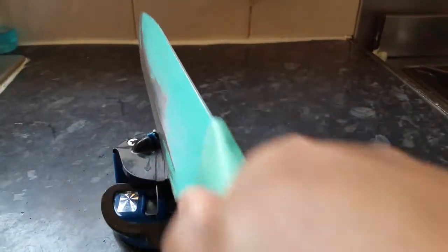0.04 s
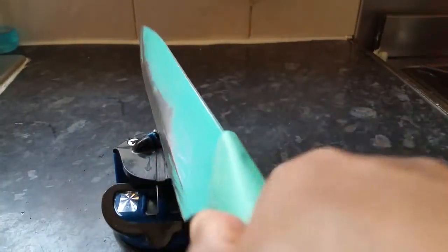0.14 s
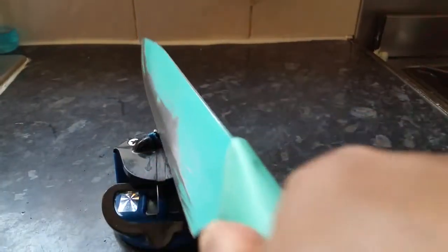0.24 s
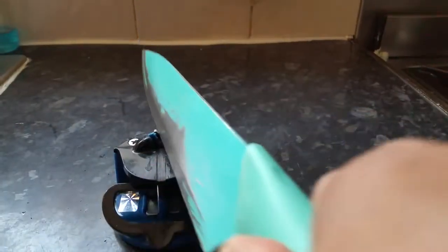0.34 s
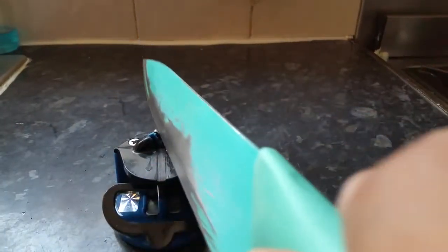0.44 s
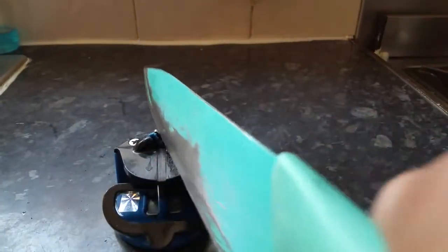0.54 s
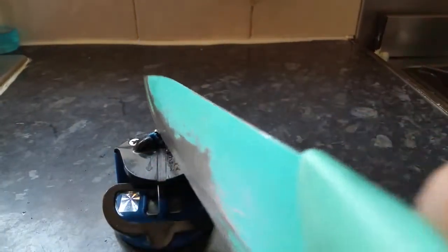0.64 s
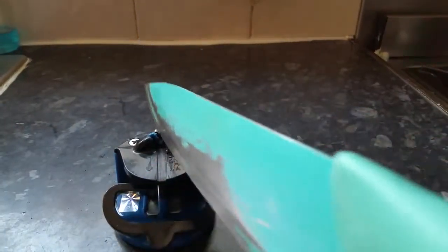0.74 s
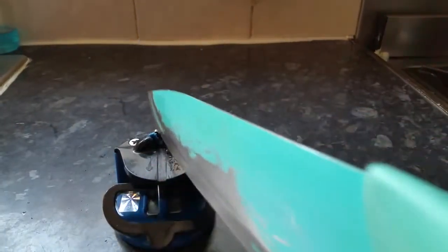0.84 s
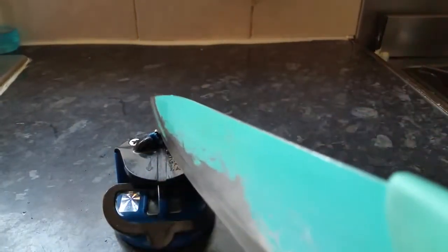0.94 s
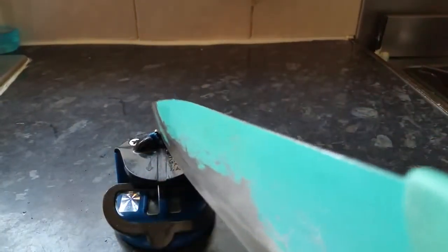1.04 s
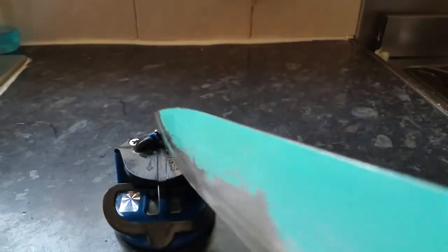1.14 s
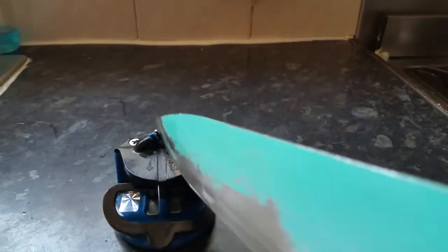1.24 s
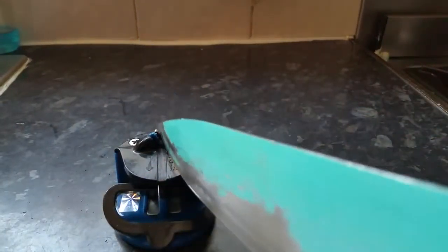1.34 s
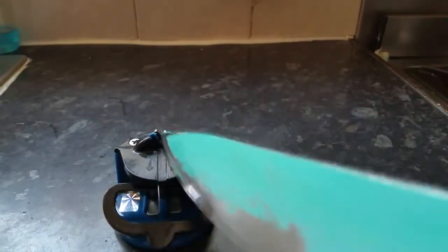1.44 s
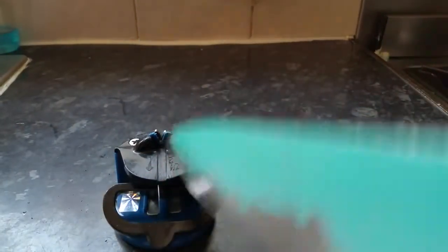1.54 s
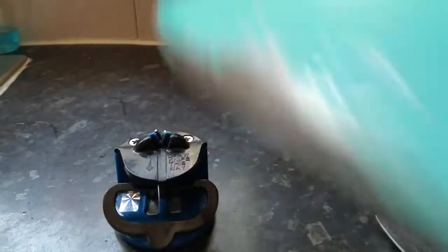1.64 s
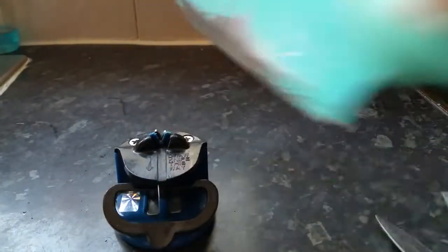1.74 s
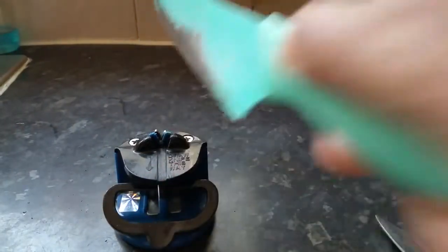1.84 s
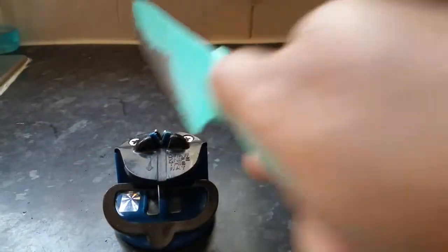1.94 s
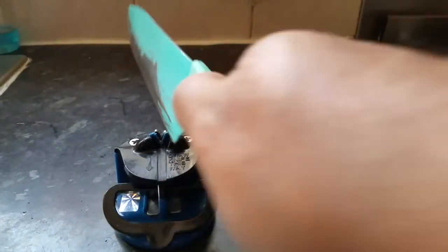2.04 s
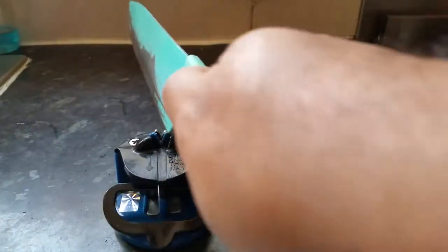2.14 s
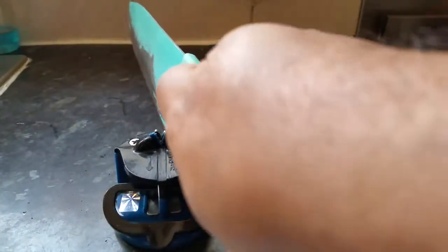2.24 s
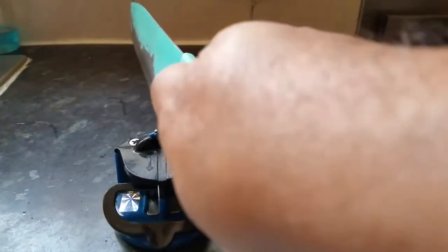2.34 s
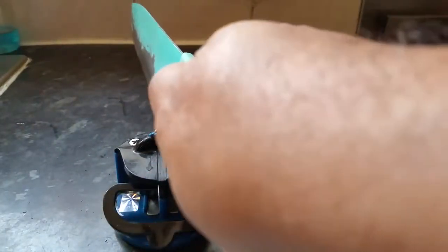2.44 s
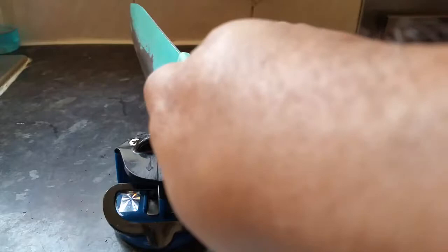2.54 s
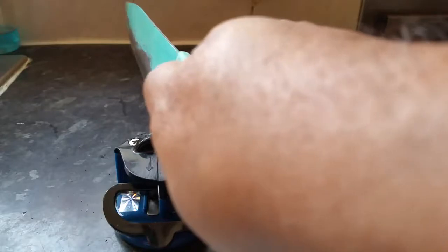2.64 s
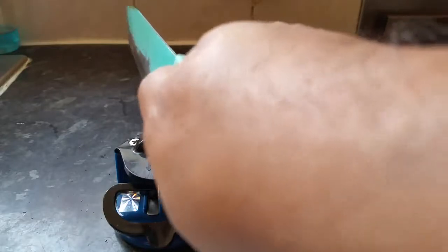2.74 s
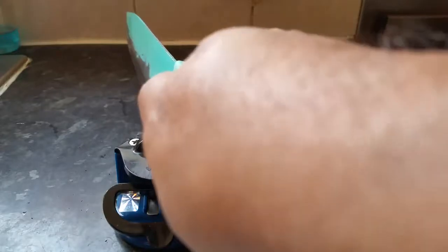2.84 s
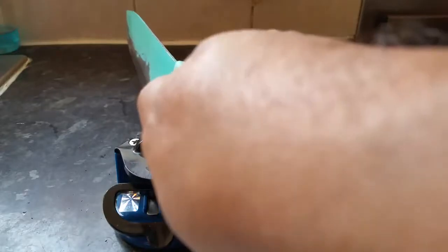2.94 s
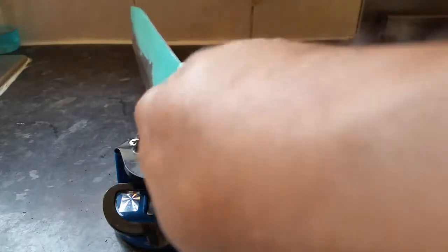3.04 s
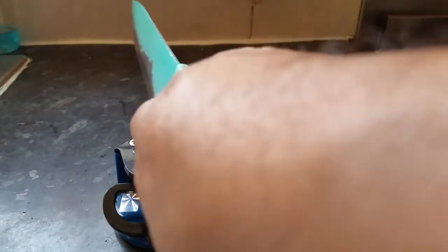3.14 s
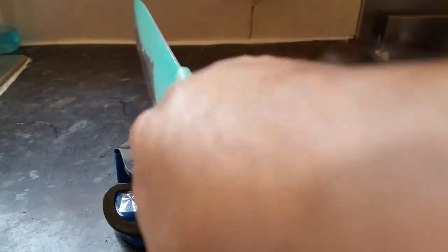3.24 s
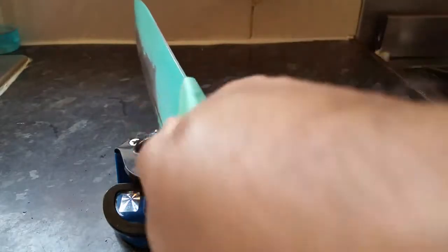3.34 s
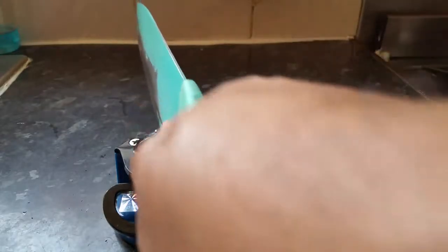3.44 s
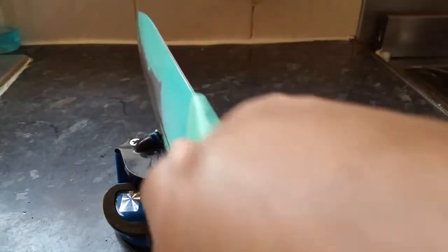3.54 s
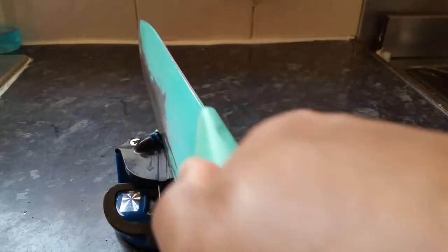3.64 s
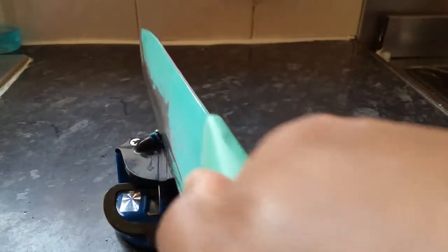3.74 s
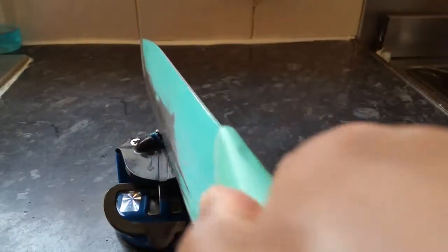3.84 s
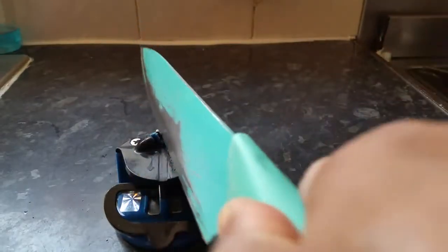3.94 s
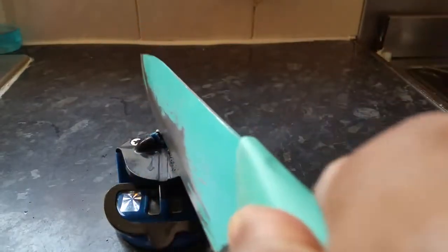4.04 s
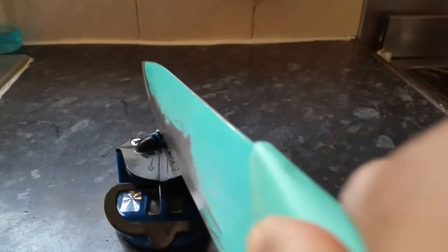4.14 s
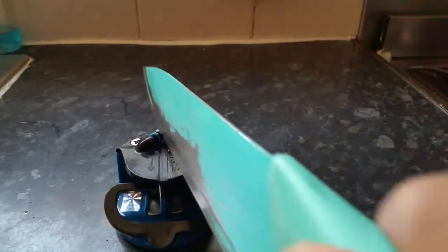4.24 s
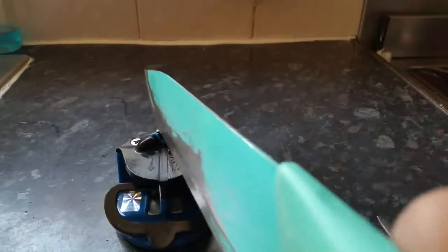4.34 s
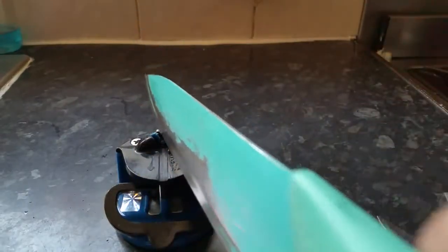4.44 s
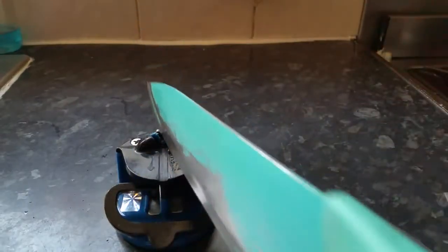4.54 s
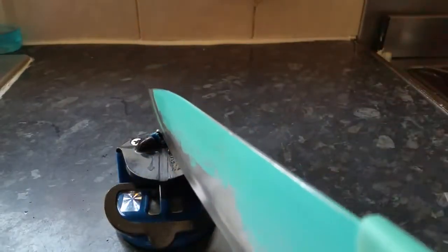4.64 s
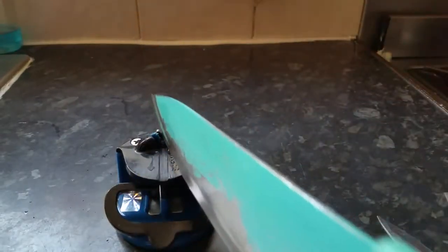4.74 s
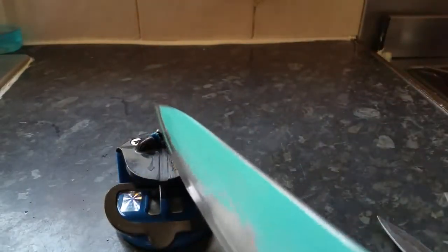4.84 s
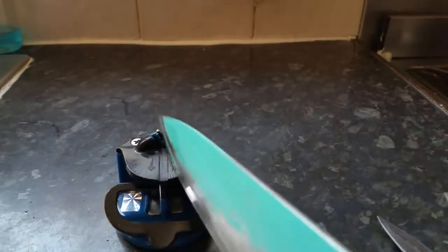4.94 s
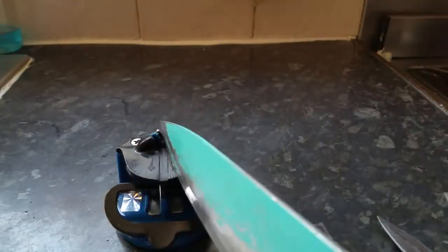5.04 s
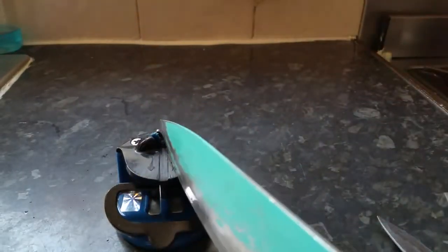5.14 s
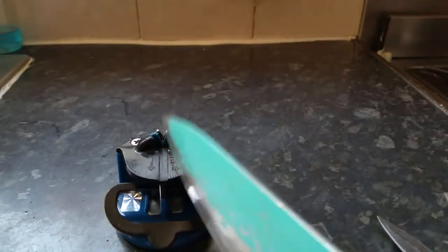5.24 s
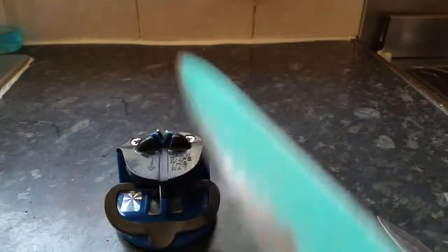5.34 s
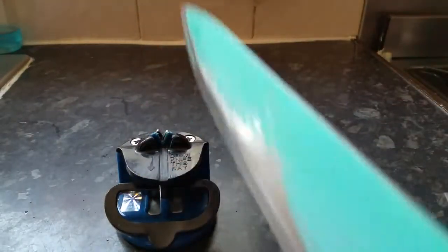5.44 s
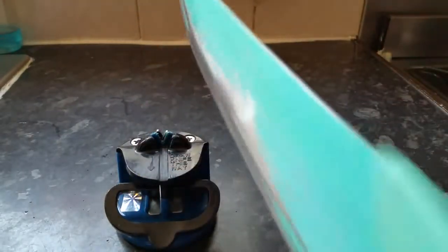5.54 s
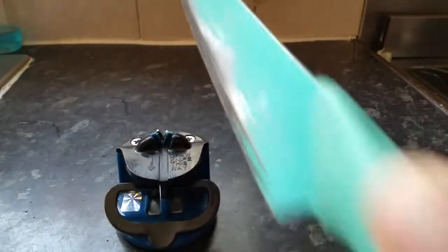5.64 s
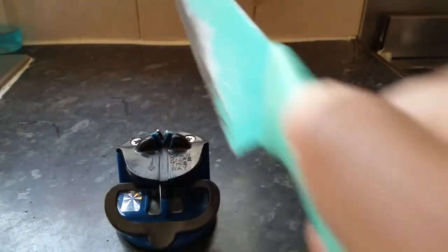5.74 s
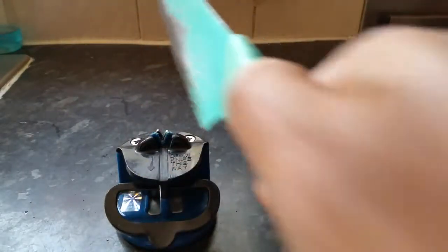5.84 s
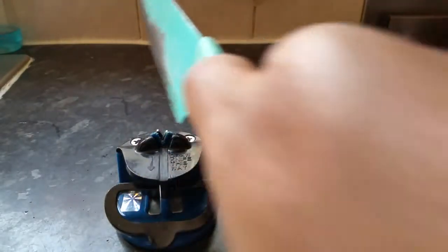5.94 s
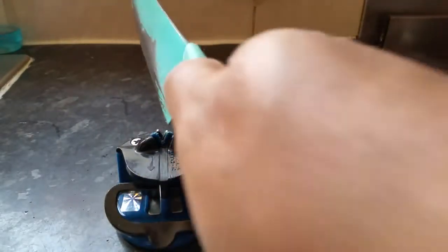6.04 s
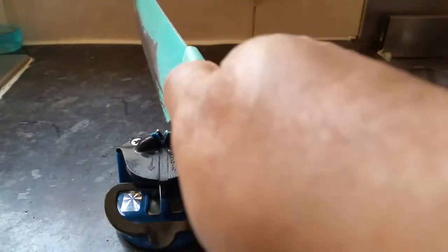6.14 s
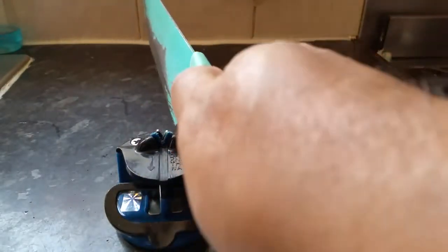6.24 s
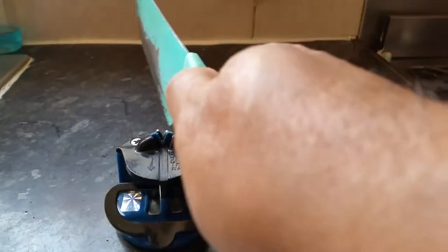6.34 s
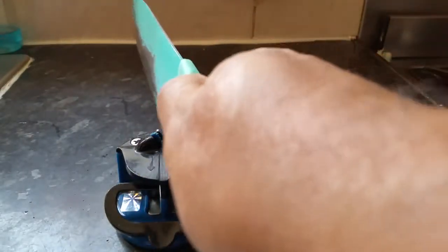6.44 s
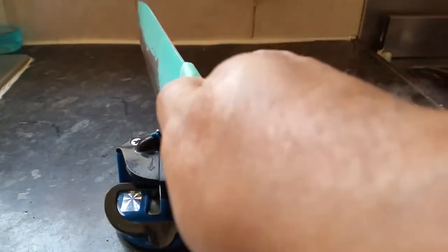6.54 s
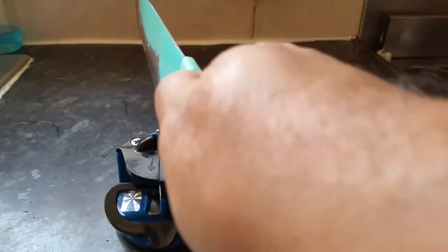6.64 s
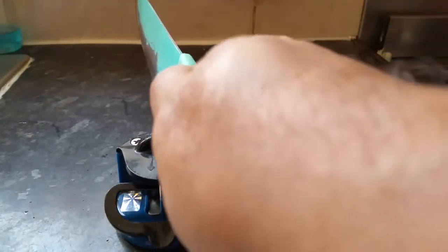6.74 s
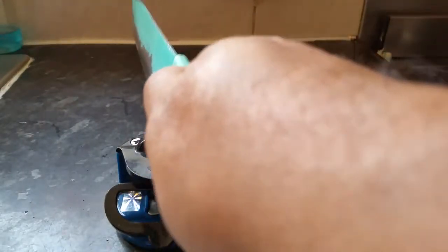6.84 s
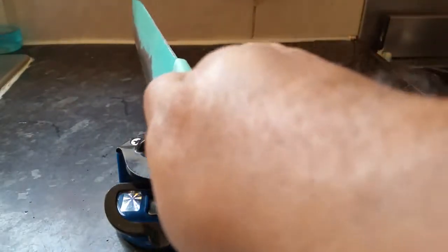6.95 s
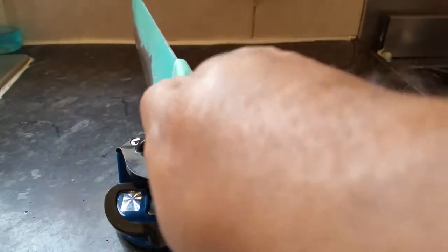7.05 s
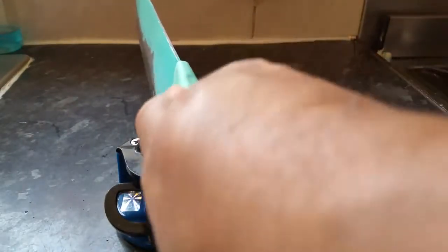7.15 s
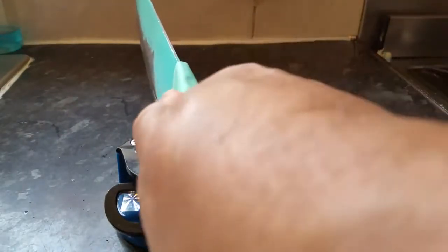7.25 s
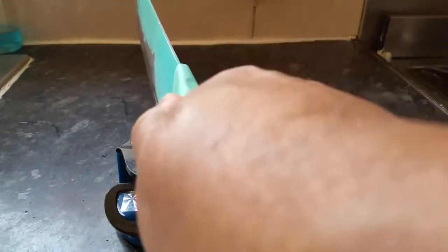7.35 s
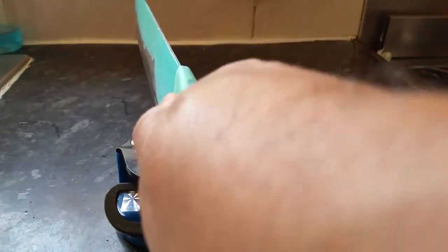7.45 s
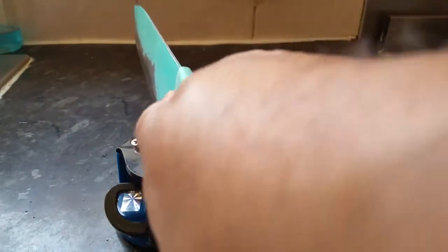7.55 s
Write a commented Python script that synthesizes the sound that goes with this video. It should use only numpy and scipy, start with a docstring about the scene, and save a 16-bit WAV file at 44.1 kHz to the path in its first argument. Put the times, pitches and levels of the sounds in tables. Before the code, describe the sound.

Close stereo sound in a small tiled kitchen, with a short bright reverberation and a quiet low hum. At 0 s a steel blade is already being dragged through a pull-through sharpener: a loud, coarse, gritty rasp with juddering rumble from the worktop and snagging clicks up to 0.6. It gradually weakens and thins after 1.0, then flares briefly and ends with a hard clack at 1.55 as the tip drops. A faint rustle follows until 1.9, soft seating thumps around 2.15, and clicks at 2.9. At 3.3 a dense crackle of snags launches the second rasp, strongest from 3.4 to 4.3, uneven and lighter around 4.45, then drier and scratchier until it stops at 5.06. A tiny hollow tick sounds at 5.33. Sparse clicks and a faint brush come at 6.55 to 7.0. From 7.38 a much quieter, dull third scrape begins with small knocks, still going at the end, about 7.6.

```python
"""A kitchen knife is drawn through a pull-through sharpener that stands on a worktop in a small tiled kitchen.
Stick-slip friction grates the edge over the carbide: dense, clumped slips drive the modes of blade, holder and
worktop, with dry scratch noise. Impulses make the ticks and thuds of the knife in the slot, the clack of its
dropping tip and one hollow touch. Decaying noise echoes form the room; a soft rustle and a quiet hum, both
filtered noise, lie below."""
import sys
import numpy as np
from scipy import signal
from scipy.fft import rfft, irfft, next_fast_len
from scipy.io import wavfile

SR = 44100
rng = np.random.default_rng(int(sys.argv[2]) if len(sys.argv) > 2 else 0)


def transcribe(signal):
    """Save signal, clipped to [-1, 1], as a 16-bit WAV file at the path in sys.argv[1]."""
    frames = np.atleast_2d(signal).T
    limited = np.clip(frames, -1, 1)
    pcm = np.round(limited * 32767).astype(np.int16)
    wavfile.write(sys.argv[1], SR, pcm)


N = 334719   # samples

# pulls of the edge through the slot, one list each: [t/s, grating level/dB, worktop weight over grating/dB]
STROKES = [
    [(0.0, -27.5, 22.5), (0.026, -46, 17.5), (0.045, -29.5, 9.5), (0.11, -29.5, 16), (0.188, -29.5, 2.5),
     (0.234, -34, 10), (0.33, -30.5, 5.5), (0.432, -31, 1.5), (0.55, -31.5, 5.5), (0.668, -32, 1),
     (0.686, -35.5, 5.5), (0.82, -33.5, 4), (0.956, -33.5, 2), (1.03, -40, 2), (1.102, -46.5, 9),
     (1.158, -38, 9), (1.234, -38, 2.5), (1.31, -44, 8), (1.39, -55.5, 16), (1.44, -45, 6),
     (1.514, -51.5, 10), (1.53, -36.5, 11.5), (1.552, -36, 14.5)],
    [(3.322, -42.5, 1.5), (3.348, -47, 23), (3.364, -38.5, 12.5), (3.382, -27, 3), (3.39, -33.5, 7),
     (3.42, -28, 1), (3.442, -34.5, 3), (3.46, -45.5, 17.5), (3.522, -45, 16.5)],
    [(3.522, -41.5, 18.5), (3.58, -34, 5.5), (3.628, -29.5, 10.5), (3.766, -30.5, 6), (3.77, -34, 16),
     (3.85, -33.5, 13), (3.94, -31, 8.5), (4.04, -33, 6.5), (4.146, -34.5, 5), (4.15, -32.5, -1),
     (4.236, -37, 8), (4.288, -31.5, 4), (4.345, -36, 5), (4.39, -42, 9), (4.435, -39, 7.5),
     (4.447, -53, 16), (4.456, -39, 7), (4.484, -39, 5.5), (4.56, -36.5, 6), (4.652, -31.5, 7.5),
     (4.70, -38, -0.5), (4.76, -43.5, 3.5), (4.81, -36, -1), (4.85, -33.5, 2.5), (4.9, -36, -3),
     (4.96, -36, -3), (5.035, -40.5, 9.5), (5.042, -55, 11.5), (5.06, -72, 11)],
    [(7.385, -54, 7), (7.397, -57.5, 34.5), (7.415, -49, 12.5), (7.471, -52, 16), (7.497, -43.5, 19),
     (7.54, -46, 18), (7.59, -48.5, 20)],
]
# the edge brushes the slot while being seated: [middle t/s, half length/s, level/dB, brightness/(dB/octave)]
BRUSHES = [(3.301, 0.03, -53, -2.5), (6.723, 0.06, -56.5, 0), (6.855, 0.012, -49.5, 0.5)]
SEAT_S, LIFT_S = 0.0049, 0.0036   # a stroke fades in as the edge seats, stops as it lifts
HOLDER_OVER_DB, HOLDER_WEIGHT_SHARE = 2.5, 0.25   # the holder feels the grating and part of the weight
BRIGHTNESS, BRIGHTER_PER_DB, FULL_DRAG_DB = 1.7, 0.07, -27   # dB/octave; a lighter drag is brighter


def stroke_controls():
    """Load-dependent friction: grating level and weight set the three bodies' gains and the brightness."""
    t = np.arange(N) / SR
    level_db, weight_db = np.full(N, -200.), np.zeros(N)   # silent between strokes
    for rows in STROKES:
        s, level, weight = np.transpose(rows)
        on = (t >= s[0]) & (t <= s[-1])
        # no fade where a stroke is already under way at the start or still under way at the end
        seating = (t[on] - s[0]) / SEAT_S + (s[0] == 0)
        lifting = (s[-1] - t[on]) / LIFT_S + (s[-1] >= t[-1])
        fade = np.clip(np.minimum(seating, lifting), 1e-6, 1)
        level_db[on] = np.interp(t[on], s, level) + 20 * np.log10(fade)
        weight_db[on] = np.interp(t[on], s, weight)
    brightness = BRIGHTNESS + BRIGHTER_PER_DB * np.clip(FULL_DRAG_DB - level_db, -10, 30)
    for s, half, db, tilt in BRUSHES:
        brush_db = db - 10 * ((t - s) / half) ** 2
        brightness[brush_db > level_db] = tilt
        level_db = np.maximum(level_db, brush_db)
    holder_db = level_db + HOLDER_OVER_DB + HOLDER_WEIGHT_SHARE * weight_db
    return from_db(level_db), from_db(holder_db), from_db(level_db + weight_db), brightness, weight_db


def catches():
    """Stick-slip: uneven one-way pulses, each time a wandering phase completes a turn."""
    rate_hz = 95 * from_db(2.5 * drift(30) + 1.5 * drift(2.5))
    turns = np.cumsum(rate_hz) / SR
    released = np.diff(np.floor(turns), prepend=0) > 0
    return released * from_db(rng.normal(0, 1.0, N))


PULL_STARTS_S, PULL_S = [-0.15, 3.35, 7.38], 1.1


def contact_place():
    """Uniform motion: the contact runs evenly along the edge, from -.5 (heel) to +.5 (tip)."""
    t, starts = np.arange(N) / SR, np.array(PULL_STARTS_S)
    pull = np.maximum(np.searchsorted(starts - .1, t) - 1, 0)
    return np.clip((t - starts[pull]) / PULL_S, 0, 1) - .5


WANDER_DB = 1.8   # the contact travels along the edge, so each mode swells and fades


def dragged(modes, drag, brightness, damping):
    """Forced modal vibration: drag on the slot's two faces drives every damped mode; levels are rms shares."""
    out, place = 0, contact_place()
    for k, (hz, level_db, t60, toward_tip_db) in enumerate(modes):
        t60 = t60 * damping
        unit_rms = np.sqrt(12 * np.log(10) / (t60 * SR))   # evens out the energy of long and short rings
        gain = from_db(level_db + brightness * np.log2(hz / 4000)) * unit_rms
        travel = from_db(toward_tip_db * place + WANDER_DB * drift(3.4))
        both, apart = ring(drag * gain * travel, hz, t60)
        share = np.clip(0.14 * np.log2(hz / 200), 0, 1)   # short waves tell the two faces apart
        out = out + (-1) ** k * (both + share * apart * [[1], [-1]])
    return out / np.sqrt(np.sum(from_db(2 * np.array(modes)[:, 1])))


# unringing scratch bands: [low f/Hz, high f/Hz, level over blade/dB]
GRIT = [(856, 2730, -3.5), (2520, 7050, -6.5), (6390, 9900, -20.5), (9900, 15000, -32),
        (13000, 16500, -37.5)]


def scratch(force, brightness):
    """Abrasive friction noise: the grinding itself, broad and dry, partly apart on the two faces."""
    out = 0
    for low_hz, high_hz, level_db in GRIT:
        both, apart = bandpass(force, low_hz, high_hz)
        gain = from_db(level_db + brightness * np.log2(np.sqrt(low_hz * high_hz) / 4000))
        unit_rms = np.sqrt(SR / 2 / (high_hz - low_hz))
        out = out + gain * unit_rms * (both + 0.53 * apart * [[1], [-1]])
    return out


# modes of the steel blade: [f/Hz, level/dB, t60/s before pressing, gain from heel to tip/dB]
BLADE = [(1508, 2, 0.023, -1), (1900, -6.5, 0.0023, 0.98), (2110, -5.5, 0.022, 1), (2341, -2, 0.018, -1.3),
         (2710, 0.5, 0.026, -1), (2860, 2.5, 0.0052, 0.91), (3590, 0.5, 0.015, 0.97),
         (4390, -5.5, 0.003, 0.91), (4880, -1, 0.007, 1), (5325, -3, 0.007, 0.94),
         (6160, -1.5, 0.009, 0.73), (6517, -3.5, 0.0064, 1), (8250, -10.5, 0.005, 0.99),
         (8700, -12, 0.0064, 0.9)]
# modes of the plastic holder: [f/Hz, level/dB, t60/s before pressing, gain from heel to tip/dB]
HOLDER = [(440, -6.5, 0.045, -5), (458.4, -4, 0.1104, 1.5), (482.3, -4.5, 0.12, 5), (520.5, -6.5, 0.147, 4),
          (547, -3, 0.03, 1), (612.7, 1.5, 0.055, -6), (652, -3, 0.028, -7.5), (810, -6, 0.038, -2),
          (851, -8.5, 0.12, -4), (935.4, -4.5, 0.028, 1.5), (1060, -5.5, 0.033, 3),
          (1181, -10.5, 0.057, -2.5), (1332, -15, 0.041, 2.5)]
# modes of the worktop slab: [f/Hz, level/dB, t60/s before pressing, gain from heel to tip/dB]
WORKTOP = [(80, -5, 0.62, 0.5), (95, -8.5, 0.2214, -8), (111.8, 3.5, 0.43, 6), (125.8, -0.5, 0.56, 2.5),
           (147, -2, 0.33, 6), (176.2, -1.5, 0.7, 8.5), (184.6, -2.5, 0.1, 4), (208.2, 0.5, 0.44, 0),
           (235, -3.5, 0.11, -2), (295.1, -3, 0.66, -7), (311.9, -4, 0.35, -1.5), (342, -5, 0.35, 0.5),
           (387.7, -10.5, 0.48, 0.5)]
SLIPS_PER_S, SLIP_SPREAD_DB, CLUMP_DB = 5000, 2.5, 2.5   # the clumps swing the rates of slips and judder
JUDDER_PER_S, JUDDER_SPREAD_DB = 400, 4
CATCH_BURST_S, CATCH_DEPTH = 0.0013, 1.6   # depth at a weight of 12.5 dB
CATCH_WEIGHT_SHARE = 0.53   # a heavier hand catches harder
PRESSED_T60_SHARE = 0.87   # a pressing hand and blade damp every mode during a stroke
PRESSED_WORKTOP_SHARE = 0.48   # the weight damps the slab more


def grating():
    """Friction-excited resonance: slips burst after each catch; catches and judder shake holder and worktop."""
    blade, holder, worktop, brightness, weight_db = stroke_controls()
    caught = catches()
    depth = CATCH_DEPTH * from_db(CATCH_WEIGHT_SHARE * (weight_db - 12.5))
    burst = 1 + depth * signal.lfilter([1], [1, -np.exp(-1 / (CATCH_BURST_S * SR))], caught)
    clumps = from_db(CLUMP_DB * drift(120))
    trains = np.array([grains(SLIPS_PER_S * clumps, SLIP_SPREAD_DB) for train in range(4)])
    slips = rms_one(burst * trains)
    judder = grains(JUDDER_PER_S * clumps, JUDDER_SPREAD_DB)
    # row 0 pushes both faces alike, row 1 pushes them apart
    mixed = rms_one(slips[:2] + 0.74 * judder * [[1], [0]])
    shaking = rms_one(judder + 0.65 * rms_one(caught) + 0.52 * slips[2:])
    blade_ring = dragged(BLADE, blade * mixed, brightness, PRESSED_T60_SHARE)
    grit = scratch(blade * slips[2:], brightness)
    holder_ring = dragged(HOLDER, holder * mixed, 0, PRESSED_T60_SHARE)
    worktop_ring = dragged(WORKTOP, worktop * shaking, 0, PRESSED_WORKTOP_SHARE)
    return blade_ring + grit + holder_ring + worktop_ring


SCUFF_S, SCUFF_SHARE = 0.0042, 0.27
SCUFF_TAIL_S, SCUFF_TAIL_SHARE = 0.014, 0.031   # the edge settles after each contact
CRACK_TREBLE_HZ = 5860
CLACK_HZ, CLACK_DB = (1300, 2900), -2   # the slot's hollow lends each crack a dull middle


def cracks():
    """Impulsive contact: a sharp click and a short dying scuff, each with its own share of treble."""
    out, t = np.zeros((2, N + 2000)), np.arange(2000) / SR
    scuff = SCUFF_SHARE * np.exp(-(t / SCUFF_S) ** 2) + SCUFF_TAIL_SHARE * np.exp(-t / SCUFF_TAIL_S)
    noises = rng.standard_normal((len(KNOCKS), 2000))
    for (s, peak_db, *_, treble_db), noise in zip(KNOCKS, noises):
        shape = noise * scuff
        shape[0] = -1   # the click
        at = round(s * SR)
        out[:, at:at + 2000] += from_db([[peak_db], [peak_db + treble_db]]) * shape
    body = signal.lfilter(*signal.butter(2, CRACK_TREBLE_HZ, fs=SR), out[0, :N] + 1e-18)
    treble = signal.lfilter(*signal.butter(2, CRACK_TREBLE_HZ, "high", fs=SR), out[1, :N] + 1e-18)
    force = body + treble
    broad = signal.lfilter(*signal.butter(1, [500, 5000], "band", fs=SR), force)
    middle = signal.lfilter(*signal.butter(1, CLACK_HZ, "band", fs=SR), force)
    return broad + from_db(CLACK_DB) * middle


def struck(modes, column, knock_db, scatter_db, flip, hard_share=1):
    """Impulse response of modes: one push strikes each by its own strength; hard ones favour upper modes."""
    rows, out = np.array(KNOCKS), 0
    at = np.round(rows[:, 0] * SR).astype(int)
    scatter = rng.normal(0, scatter_db, (len(rows), len(modes)))
    middle = np.exp(np.mean(np.log(np.array(modes)[:, 0])))
    for k, (hz, level_db, t60, _) in enumerate(modes):
        push = np.zeros(N)
        tilt_db = hard_share * rows[:, 4] * np.log2(hz / middle)
        mode_db = level_db - 10 * np.log10(t60) + tilt_db + scatter[:, k]
        push[at] = from_db(rows[:, column] + knock_db + mode_db)
        out = out - flip ** k * ring(push, hz, t60)   # flip near -1: neighbouring modes start opposite ways
    return out


# knife meets or snags in the slot, levels relative:
# [t/s, crack level/dB, holder level/dB, worktop level/dB, hardness/(dB/octave), crack treble level/dB]
KNOCKS = [(0.0199, -9, -17.5, -26, 0.5, -5.5), (0.028, -6.5, -13.5, -18, 1.5, -8),
          (0.047, -20, -31, -13.5, 0.5, -1.5), (0.152, -22, -32, -18.5, 11, 0.5),
          (0.163, -28, -43, -16, 8, -0.5), (0.1805, -11, -36, -34, 14, 2.5),
          (0.2005, -13, -33.5, -33, 3, -1.5), (0.3189, -16.5, -19.5, -18.5, 5, -7.5),
          (0.5884, -12.5, -22, -52, 1, -3), (0.7753, -17, -41, -29, 2, -2), (0.817, -24, -41.5, -30, 4, -1),
          (1.093, -35, -44.5, -45, 7.5, 0), (1.362, -38, -55, -55, 1.5, 10),
          (1.546, -14.5, -10.5, -20.5, -1, 0), (1.581, -58, -43.5, -26.5, 4.5, 1.5),
          (1.664, -27, -30, -29, 1.5, 6), (2.1496, -38, -38, -26.5, -7, -3),
          (2.156, -33, -36, -41, -3, 1.5), (2.183, -80, -59, -39, -9, 0), (2.282, -82, -80, -36, -6, 0),
          (2.8729, -22.5, -30, -45, 6.5, 4), (2.916, -29, -23.5, -24, 2, 0.5),
          (3.3262, -31, -38, -32.5, -10, -8), (3.339, -33, -33, -42, 8.5, -8),
          (3.346, -22, -38, -29.5, -17.5, -8), (3.3571, -21, -41, -23.5, -8.5, -4),
          (3.3678, -15, -26, -33, 13, -6), (3.379, -14.5, -37, -20.5, 6, -4),
          (3.408, -16, -30, -32, -2, -3), (3.4168, -10.5, -34, -16.5, 2, -2),
          (3.4292, -14, -50, -15.5, 4, 7.5), (3.439, -10.5, -26, -14.5, 1, 0),
          (3.4996, -17, -22, -47, 4.5, -6), (3.5299, -21, -26, -18.5, 6.5, -8.5),
          (3.558, -21, -27, -23, 4, -9), (3.566, -21.5, -30, -16, 6, -4), (3.575, -12.5, -35, -15, -2, -4),
          (3.582, -18, -33, -20, 12.5, 3), (3.598, -16, -34, -19.5, 0, 0),
          (3.6084, -13, -34, -17.5, 7.5, -1), (3.922, -27, -38, -35, -16, 0),
          (4.1512, -18, -43, -28.5, 0, -8), (4.454, -28, -48, -41, 0, -3), (4.475, -24.5, -43, -49, 0, -5),
          (4.668, -28, -19, -26.5, 0.5, -6), (4.701, -32, -34, -33, -3, -6),
          (6.545, -25, -30, -28.5, 0, -1), (6.593, -28, -49, -48, 8, 0),
          (6.9797, -20.5, -26.5, -37.5, 0.5, 3), (6.9931, -28, -35, -28, 3, 0),
          (7.380, -28, -34, -39, -6, -4), (7.4177, -26, -25, -29, -7, -4),
          (7.438, -30, -45, -28.5, -11.5, -8), (7.482, -34.5, -48, -27.5, -14, -5),
          (7.493, -24, -44, -29.5, -3, -10), (7.521, -29, -25.5, -24, -10, 0),
          (7.533, -26, -34, -41, -8, -11), (7.544, -32, -36, -41, -8, -3), (7.566, -26, -37, -25.5, -2, -4)]
THUD_CUT_HZ = 550   # the slab takes a blow softly


def knocks():
    """Impact excitation: each contact cracks and rings the blade, the holder and the softly struck worktop."""
    blade = struck(BLADE, column=1, knock_db=-33, scatter_db=3.0, flip=-0.96, hard_share=0)
    holder = struck(HOLDER, column=2, knock_db=-23.0, scatter_db=4.0, flip=-1.002)
    thuds = struck(WORKTOP, column=3, knock_db=-12.0, scatter_db=1.5, flip=0.99)
    soft_thuds = signal.lfilter(*signal.butter(2, THUD_CUT_HZ, fs=SR), thuds)
    blows = from_db(1.0) * cracks() + blade + holder + soft_thuds
    # a brief blow hardly moves the slab's deepest bass
    return signal.lfilter(*signal.butter(2, 95, "high", fs=SR), blows)


# modes of the blade tip: [f/Hz, level/dB, t60/s]
DROP = [(2720, -2.5, 0.006), (3070, 7, 0.0057), (3540, 2, 0.0068), (4870, -22, 0.006), (7290, -16, 0.006),
        (8800, -12, 0.006)]
DROP_S, DROP_DB, DROP_RATTLE_S = 1.5452, -12, 0.0017


def drop():
    """Impact with rattle: the tip drops off the carbide and its few broad modes give a hard clack."""
    t, push = np.arange(4000) / SR, np.zeros(N)
    dying = np.exp(-t / DROP_RATTLE_S) + .04 * np.exp(-t / 0.014)
    rattle = 0.087 * rng.standard_normal(4000) * dying
    rattle[0] = 1   # the push itself
    push[round(DROP_S * SR):][:4000] = from_db(DROP_DB) * rattle
    return sum((-1) ** k * from_db(db) * ring(push, hz, t60) for k, (hz, db, t60) in enumerate(DROP))


# modes of the small hollow tick: [f/Hz, level/dB, t60/s]
TICK = [(547, -3.5, 0.1), (1078, -4.5, 0.038), (1570, -6, 0.028), (2080, -12, 0.045), (2700, -4.5, 0.018),
        (3260, -8.5, 0.02)]
TICK_S, TICK_DB = 5.334, -38


def tick():
    """Light impact: the lifted knife touches something, clicks and rings a few short modes."""
    push = np.zeros(N)
    push[round(TICK_S * SR)] = from_db(TICK_DB)
    click = from_db(10.5) * signal.lfilter(*signal.butter(1, [2500, 8000], "band", fs=SR), push)
    return click + sum((-1) ** k * from_db(db) * ring(push, hz, t60) for k, (hz, db, t60) in enumerate(TICK))


def echo_tail(t60_table, db_table, first_s):
    """Diffuse reverberation: noise-like echoes, other ones on each side, dying band by band."""
    t, tail = np.arange(SR) / SR, 0
    edges = 50 * 2 ** np.arange(0, 9.)
    for low, high in zip(edges, np.minimum(2 * edges, .45 * SR)):
        centre = np.sqrt(low * high)
        band = bandpass(rng.standard_normal((2, SR)), low, high)
        decay = from_db(-60 * t / at_hz(t60_table, centre)) * (t > first_s)
        tail = tail + band * decay * from_db(at_hz(db_table, centre)) / np.sqrt(np.sum(decay ** 2))
    return tail


# level difference of the two microphone ports: [f/Hz, left minus right level/dB]
PORT_BALANCE = [(60, 6), (130, 4), (290, 1), (640, 0.5), (1410, -1.5), (3100, 1), (6000, 2), (8500, 4.5),
                (15000, 0)]
# phase difference of the ports: [f/Hz, left lead/rad]
PORT_PHASE = [(3400, 0), (4600, 0.85), (5600, 0), (6630, 1.1), (8440, 0.1), (9300, 0.8), (14000, 0.41)]
# echoes of worktop, tiles and hands right beside the slot: [f/Hz, level over direct sound/dB]
NEAR_DB = [(80, -15), (300, -16), (1000, -7), (4000, -9), (12000, -4)]
NEAR_T60_S = 0.022
# decay of the kitchen: [f/Hz, t60/s]
KITCHEN_T60 = [(80, 0.13), (500, 0.51), (1500, 0.45), (4000, 0.32), (10000, 0.31)]
# late echoes of the kitchen: [f/Hz, level over direct sound/dB]
KITCHEN_DB = [(80, -9.5), (300, -15.5), (600, -1.5), (1200, -7.5), (3000, -6.5), (6000, -10), (12000, -9)]
DROP_ROOM_DB = -8   # the tip faces the microphone, so its clack carries less of the room


def ports_and_kitchen(x, facing):
    """Convolution with a room response: direct sound, near echoes and late tail at two microphone ports."""
    size = next_fast_len(N + SR)
    hz = np.maximum(np.fft.rfftfreq(size, 1 / SR), 10)
    # half the difference between the ports goes to each
    half = from_db(at_hz(PORT_BALANCE, hz) / 2) * np.exp(.5j * at_hz(PORT_PHASE, hz))
    near = 1 + rfft(echo_tail([(1000, NEAR_T60_S)], NEAR_DB, first_s=.0004), size)
    late = rfft(echo_tail(KITCHEN_T60, KITCHEN_DB, first_s=0.0041), size)
    heard = rfft(x, size) * (near + late) + rfft(facing, size) * (near + from_db(DROP_ROOM_DB) * late)
    return irfft(heard * np.array([half, 1 / half]), size)[:, :N]


# a soft rustle as the arm swings the knife back: [middle t/s, half length/s, level/dB]
RUSTLES = [(1.79, 0.08, -62), (1.63, 0.06, -61)]


def rustle():
    """Granular friction noise: dense soft grains that swell and fade, other ones on each side."""
    t = np.arange(N) / SR
    swell = sum(from_db(db - 10 * ((t - s) / half) ** 2) for s, half, db in RUSTLES)
    cloth = np.array([grains(6000, 3.3) for side in range(2)])
    return swell * rms_one(signal.lfilter(*signal.butter(1, (900, 8920), "band", fs=SR), cloth))


# spectrum of the room hum: [f/Hz, relative level per Hz/dB]
HUM = [(25, 1.5), (40, 8.5), (55, -1.5), (145, -5), (229, -2), (260, -13), (305, 3), (340, -10), (620, -19),
       (1600, -26), (4200, -32.5), (5300, -32), (6200, -37.5), (7600, -37.5), (16000, -43)]
# interaural likeness of the hum: [f/Hz, left-right correlation]
HUM_LIKENESS = [(60, 0.897), (240, 0.98), (950, 0.2), (3770, -0.44), (15000, -0.023)]
HUM_DB = -51.5   # mean of the two sides, which stand 0.8 dB above and below


def hum():
    """Partly coherent stationary noise in half-octave bands, alike on both sides in the bass."""
    out, edges = 0, 25 * 2 ** np.arange(0, 9.6, .5)
    white = rng.standard_normal((2, 2, N))   # neighbouring bands use different noise
    for k, (low, high) in enumerate(zip(edges, edges[1:])):
        mid, side = bandpass(white[k % 2], low, high)
        hz = np.sqrt(low * high)
        alike = np.clip(at_hz(HUM_LIKENESS, hz), -1, 1)
        stereo = np.sqrt(1 + alike) * mid + np.sqrt(1 - alike) * side * [[1], [-1]]
        out = out + from_db(at_hz(HUM, hz)) * stereo
    return from_db(HUM_DB) * rms_one(out) * from_db([[.8], [-.8]])


def ring(force, hz, t60):
    """Damped harmonic oscillator: a unit click sets a sine of height 1 ringing."""
    r, w = from_db(-60 / (t60 * SR)), 2 * np.pi * hz / SR
    return signal.lfilter([0, np.sin(w)], [1, -2 * r * np.cos(w), r * r], force + 1e-18)


def grains(per_s, spread_db):
    """Poisson-like process: random clicks of uneven size and sign; rms 1."""
    sizes = from_db(spread_db * np.minimum(rng.exponential(1, N), 5)) * rng.choice([-1, 1], N)
    return rms_one(sizes * (rng.random(N) < per_s / SR))


def drift(rate):
    """Low-passed random fluctuation: a double one-pole at rate/Hz on every 40th sample, run in; spread 1."""
    r = np.exp(-80 * np.pi * rate / SR)
    slow = signal.lfilter([1], [1, -2 * r, r * r], rng.standard_normal(N // 40 + 2002))[2000:]
    return np.interp(np.arange(N) / 40, np.arange(len(slow)), rms_one(slow))


def bandpass(x, low_hz, high_hz):
    """Band limitation: a Butterworth band-pass."""
    return signal.sosfilt(signal.butter(2, [low_hz, high_hz], "band", fs=SR, output="sos"), x)


def from_db(db):
    """Logarithmic level law: decibels to gain."""
    return 10 ** (np.asarray(db) / 20)


def rms_one(x):
    """Energy normalisation: scaled to unit rms."""
    return x / np.sqrt(np.mean(x ** 2) + 1e-20)


def at_hz(points, hz):
    """Logarithmic pitch scale: straight lines on a log-frequency axis."""
    return np.interp(np.log(hz), np.log(np.array(points)[:, 0]), np.array(points)[:, 1])


def scene():
    """Superposition: knife and dropping tip in the kitchen, over the rustle and the hum."""
    knife = grating() + knocks() + tick()
    return ports_and_kitchen(knife, drop()) + rustle() + hum()


def record(dry):
    """Band-limited transduction: the microphone drops the deep bass; the top is cut."""
    thin = signal.sosfilt(signal.butter(4, 68.62, "high", fs=SR, output="sos"), dry)
    return signal.sosfilt(signal.ellip(12, .5, 70, 15800, fs=SR, output="sos"), thin)


dry = scene()
out = record(dry)
transcribe(out)
```